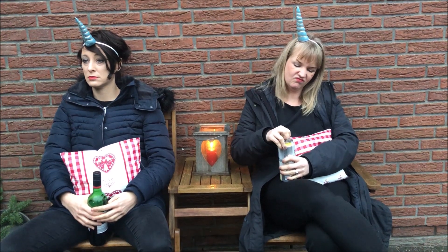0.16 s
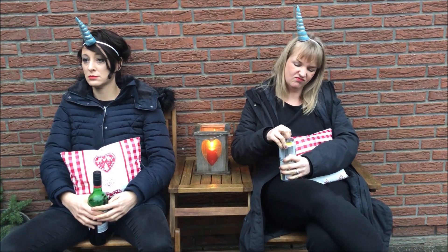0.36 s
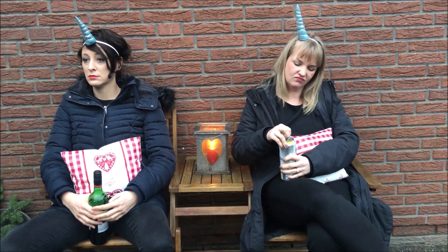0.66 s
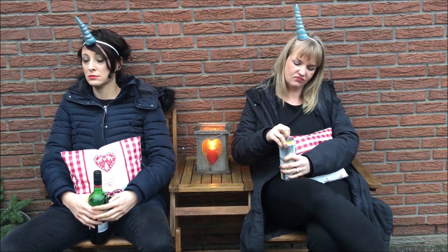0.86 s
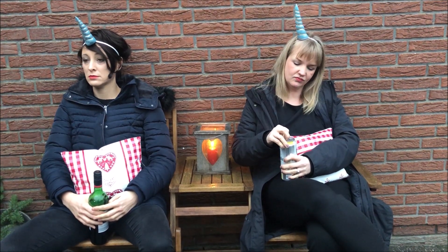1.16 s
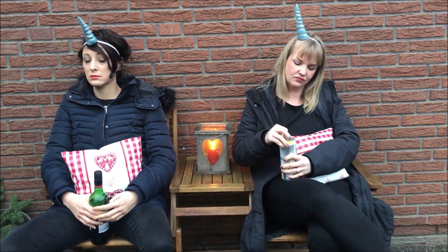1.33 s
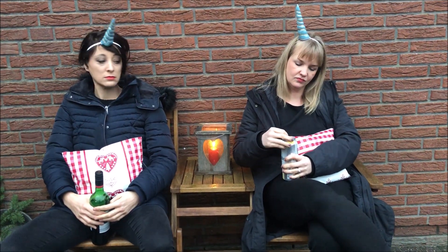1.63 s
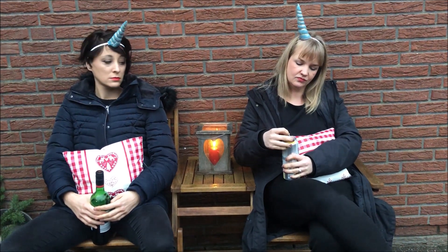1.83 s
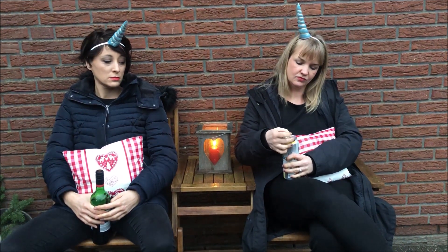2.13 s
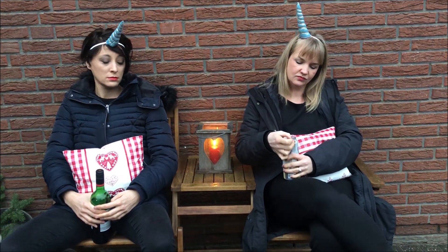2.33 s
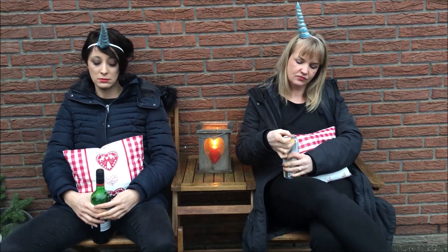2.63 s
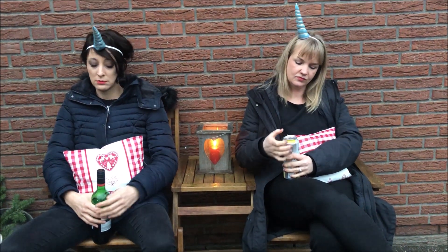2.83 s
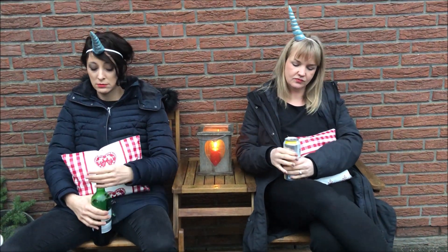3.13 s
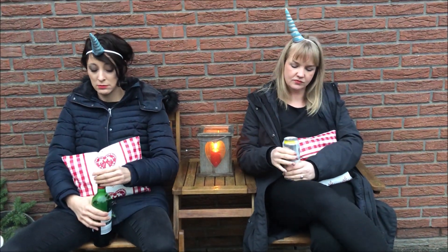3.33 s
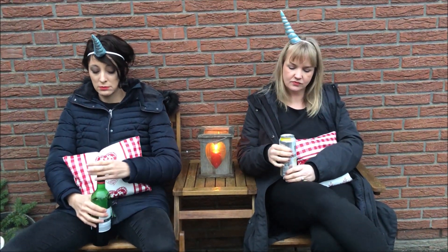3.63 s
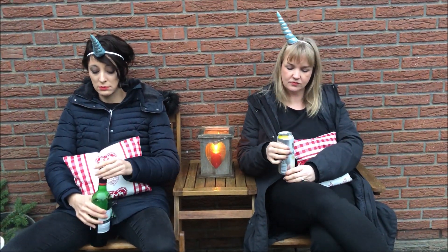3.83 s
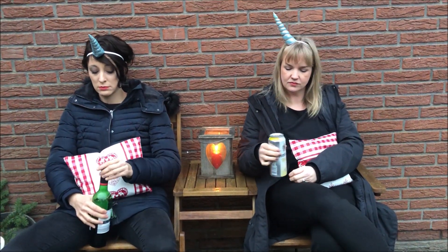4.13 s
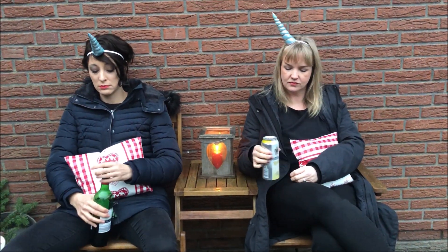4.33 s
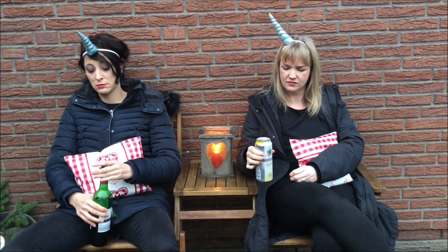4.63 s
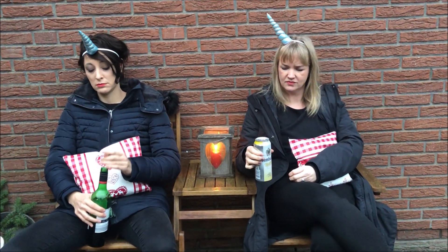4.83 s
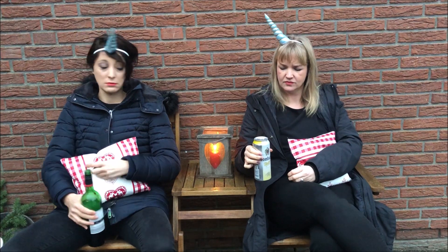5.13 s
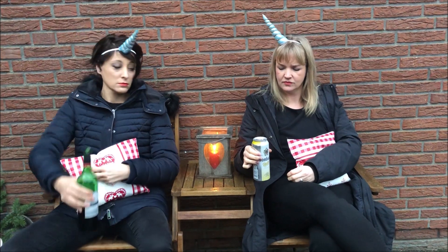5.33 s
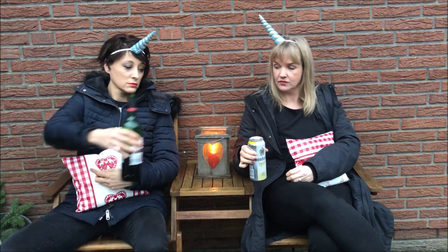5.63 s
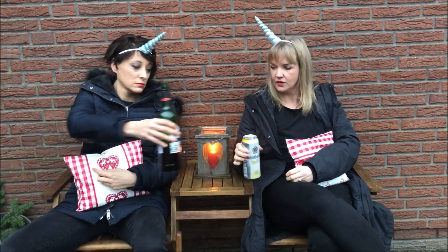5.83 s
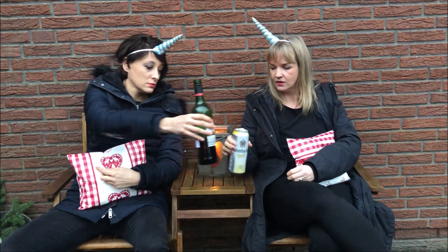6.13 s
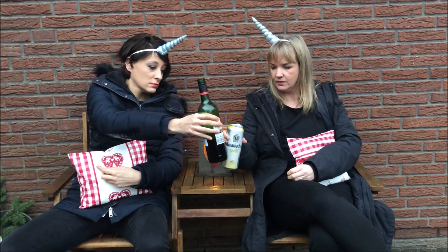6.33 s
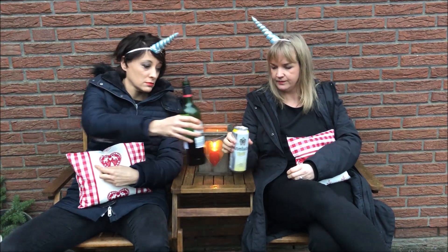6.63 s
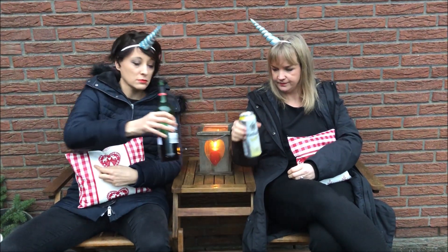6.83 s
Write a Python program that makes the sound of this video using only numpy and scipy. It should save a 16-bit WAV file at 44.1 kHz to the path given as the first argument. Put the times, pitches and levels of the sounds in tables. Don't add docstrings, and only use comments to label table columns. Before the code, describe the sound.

Outdoors by a brick wall, heard from a few metres on a phone: a bright spit of gas, a metallic crack and the loudest snap as a can opens, followed by small tinny creaks and a click. Much quieter, nylon sleeves rustle while a metal cap scrapes and ratchets irregularly from a wine bottle. A glassy knock, hollow hum, tiny slosh and soft clink follow, over low distant traffic.

```python
import sys
import numpy as np
from scipy import signal
from scipy.fft import rfft, irfft, next_fast_len
from scipy.io import wavfile
from scipy.ndimage import uniform_filter1d

SR = 44100
rng = np.random.default_rng(int(sys.argv[2]) if len(sys.argv) > 2 else 0)


def bounce(signal):
    frames = np.transpose(np.atleast_2d(signal))
    limited = np.clip(frames, -1, 1)
    pcm = np.round(limited * 32767).astype(np.int16)
    wavfile.write(sys.argv[1], SR, pcm)


def voltage_ratio(decibels):
    exponent = np.asarray(decibels, float) / 20
    return 10 ** exponent


N = 307818


# (frequency [Hz], level [dB])
TRAFFIC_BASS = [(20, -37), (35, -22.5), (58, -1.5), (75, -12.5), (88, -12), (101, 2.5), (115, -13),
                (150, -1), (185, -7), (215, -3), (255, -3), (290, -10.5), (345, -11), (400, -16.5)]
# (frequency [Hz], level [dB])
TRAFFIC_HISS = [(250, -30.5), (420, -4), (1150, -14.5), (1220, -17), (1460, -20), (3140, -25), (8970, -31),
                (16000, -35.5)]
# (middle [s], length [s], level [dB], dull part re level [dB])
ARM_MOVES = [(0.528, 0.17, -69.5, -0.5), (1.084, 0.15, -85, 6), (3.01, 0.49, -71.5, -2.5),
             (3.413, 0.46, -74.5, 1), (3.733, 0.2, -72.5, 5.5), (4.357, 1, -88.5, 6),
             (5.095, 0.46, -74, -5), (5.46, 0.56, -85, 8), (5.9, 0.83, -83, 11), (6.256, 0.67, -73, 1.5),
             (6.98, 0.9, -83, 7.5)]
# (delay [s], level [dB])
SLAPS = [
    (.0033, -6),
    (.0046, -13),
    (.0072, -17),
    (.0195, -22),
]
# (time [s], frequency [Hz], peak [dB], t60 [s])
BUMPS = [
    (4.886, 63, -48.5, 0.17),
    (5.204, 322, -50, 0.073),
    (5.235, 450, -40, 0.013),
    (6.431, 290, -44, 0.03),
]
# (time [s], peak [dB], body [dB], sizzle [dB], contact [ms])
RING_TICK = [
    (6.0891, -49, -7, -11, 0.84),
]
# (frequency [Hz], level [dB], t60 [s])
RING_MODES = [(2660, 4, 0.017), (3600, -5, .015)]
# (time [s], peak [dB], body [dB], sizzle [dB], contact [ms])
WOOD_TAP = [
    (6.955, -71, 16, 0.0017, 2.67),
]
# (frequency [Hz], level [dB], t60 [s])
WOOD_MODES = [(700, 0, 0.0366)]

# (time [s], level [dB], bubble pitch [Hz])
SLOSH = [
    (5.2, -72, 700),
    (5.211, -65, 800),
    (5.25, -60.5, 960),
    (5.282, -58.5, 1170),
    (5.32, -62.5, 1870),
    (5.345, -69.5, 2210),
    (5.37, -85, 2400),
]
# (time [s], peak [dB], body [dB], sizzle [dB], contact [ms])
NECK_KNOCK = [
    (4.8785, -43, 6, 4.5, 3.2),
]
# (frequency [Hz], level [dB], t60 [s])
NECK_MODES = [(1130, -6.5, 0.058), (1350, -15.5, 0.31), (1556, -7.5, 0.05), (2556, -5, .09),
              (2627, -10, 0.15), (2860, -12, 0.14), (3490, -6, 0.067), (3720, -8, .06), (5420, -3, .05),
              (5555, 1.5, 0.12), (6720, 0, .045), (8340, -11, .015)]
# (time [s], peak [dB], body [dB], sizzle [dB], contact [ms])
WINE_SLAPS = [
    (4.844, -61.5, 4.3, 1, 1.63),
    (5.2058, -55, 13.3, 2, 0.82),
    (5.2163, -65, 22, -8, 1.5),
    (5.2236, -44, 3.3, -2, 0.264),
    (5.2374, -70, 8.9, -8, 0.8),
]
# (frequency [Hz], level [dB], t60 [s])
WINE_SLAP_MODES = [(800, 21, 0.0036), (1700, -0.5, 0.016), (2880, -17, 0.011)]
# (time [s], peak [dB], body [dB], sizzle [dB], contact [ms])
TOAST = [
    (6.4125, -50, 4.5, 6, 3.3),
    (6.4283, -61, 8.7, -6, 3.7),
    (6.447, -62.5, 12, -10, 2.8),
    (6.4915, -59.5, 6, 1, 3.6),
    (6.5185, -79, 27, -8, 4.4),
]
# (frequency [Hz], level [dB], t60 [s])
TOAST_MODES = [(1450, 3, 0.035), (1800, 8, 0.027), (2720, -21, 0.017)]
# (time [s], level [dB], length [s])
GRIND = [
    (6.414, -52.5, 0.036),
    (6.488, -67, .04),
    (6.512, -73, 0.046),
]
# (time [s], peak [dB], body [dB], sizzle [dB])
CAP_TICKS = [(3.2076, -59, -9, -14), (3.4319, -43.5, -17, 2.5), (3.4482, -53, 7, -17), (3.4982, -53, 2, -7),
             (3.5085, -42, -1, -14), (3.5554, -51, -8, 2), (3.5624, -41.5, 3, -11), (3.6606, -65, -13, -15),
             (3.7015, -50, 8, -1), (3.7582, -53, 5, -2), (3.7878, -54, -10, -20), (3.8631, -60, -16, -19),
             (3.895, -62, -6, -13), (3.928, -57, 10.5, 1), (3.9902, -63, 14, 9), (4.2426, -56.5, -10, -6),
             (4.253, -60.5, 2, -5), (4.3599, -52, -10, -15), (4.3999, -55, -0.5, 1), (4.4787, -56, 3, -5),
             (4.5111, -49.5, -6, 2), (4.6518, -60.5, 4, -14)]
# (frequency [Hz], level [dB], t60 [s])
CAP_MODES = [(1960, -5, .012), (2530, -6, .012), (3040, -4, .015), (3420, 0, .025), (5400, -8, .008)]
# (time [s], level [dB], length [s])
CAP_TWISTS = [(3.429, -62.5, 0.085), (3.51, -67, 0.083), (3.55, -70, 0.05), (3.66, -65.5, 0.073),
              (3.696, -63, 0.087), (3.772, -75, 0.064), (3.868, -80, 0.097), (3.93, -70, 0.1),
              (4.246, -75, 0.071), (4.347, -84, .07), (4.456, -74.5, 0.065), (4.507, -81, .07),
              (4.65, -80, .04)]
# (time [s], level [dB], length [s])
CAP_CHATTER = [
    (3.44, -61, .06),
    (3.66, -67.5, .08),
    (3.705, -58, .06),
    (3.76, -69, .05),
    (3.785, -70, 0.065),
    (3.862, -67, 0.047),
    (3.893, -69, .04),
    (3.928, -76, 0.049),
]

# (time [s], peak [dB], body [dB], sizzle [dB])
NAIL_TAPS = [
    (2.0354, -60, -13, -11),
    (2.058, -50, -19, -9),
    (2.4094, -40, 5, 9),
]
# (frequency [Hz], level [dB], t60 [s])
NAIL_MODES = [(990, -3, 0.011), (1400, -1, 0.0068), (2136, 15.5, 0.0034), (2680, 1, 0.0072),
              (3530, -13, 0.0046), (4440, -6, 0.0065), (6130, -5, 0.0099), (6820, -2, 0.011),
              (7260, -4, 0.011), (9600, -1, 0.0086), (11000, -7, 0.0079)]
# (time [s], level [dB], length [s])
CREAKS = [
    (.482, -58, 0.055),
    (.53, -71, 0.04),
    (.652, -69, .06),
    (.8, -75, 0.087),
    (1.004, -68, 0.076),
    (1.037, -62, 0.029),
    (1.05, -77, .06),
    (1.1, -74, 0.053),
]
# (time [s], peak [dB], body [dB], sizzle [dB])
TAB_BENDS = [(0.4692, -40, 1, 3.5), (0.507, -50.5, 4, 1), (0.5223, -53, -14, -4), (0.5308, -49, -0.5, 0.5),
             (0.5407, -50.5, 1.5, -2), (0.5712, -55.5, -1, 1), (0.6509, -54, 2, 4.5), (0.6754, -56, -3, -4),
             (0.7458, -59, -1, -5), (0.8013, -66.5, 7.5, 14.5), (0.8085, -59.5, 4, -3),
             (0.826, -58.5, -5, 7.5), (0.85, -68, -7, 15), (0.8786, -61, 2, 15.5), (0.8977, -48.5, -5.5, 4),
             (0.9679, -53, 4, 19.5), (1.004, -42.5, -1.5, 3.5), (1.048, -47.5, 3, 14.5),
             (1.2704, -69.5, 13.5, 18)]
# (time [s], peak [dB], body [dB], sizzle [dB])
TAB_SLIP = [
    (1.0355, -50, -14, 4),
]
# (time [s], peak [dB], body [dB], sizzle [dB], contact [ms])
TAB_SNAP = [
    (1.0983, -29.5, -9, -5, 0.7),
]
# (frequency [Hz], level [dB], t60 [s])
LID_LOW_MODES = [(1058, 6.5, 0.055), (1365, 5, 0.022), (1660, 2, 0.015), (2030, 0.5, 0.038),
                 (2130, -16, 0.039)]
# (frequency [Hz], level [dB], t60 [s])
LID_TOP_MODES = [(3680, 5, 0.0071), (4130, -4, 0.0075), (6560, -6, 0.0043), (6820, -1.5, .007),
                 (7700, -6, 0.0054), (9750, -2, .012), (11700, -13, 0.0035), (13200, 2.5, .006)]
# (body from, body to, middle from, middle to, sizzle from) [Hz]
LID_BANDS = (900, 2100, 3000, 4500, 6300)
# (time [s], level [dB])
TEAR = [
    (.263, -41.5),
    (.28, -41),
    (.292, -37.5),
    (.3, -32),
    (.312, -33.5),
    (.34, -48),
    (.45, -63.5),
]
# (frequency [Hz], level [dB])
TEAR_COLOUR = [(240, -46.5), (400, -23), (588, -16.5), (800, -7), (1300, -14), (2120, -6), (3210, -7.5),
               (4310, -2), (5600, -2), (8630, -8.5), (16000, -20)]
# (time [s], frequency [Hz], peak [dB], t60 [s])
POPS = [
    (0.1004, 800, -33, .012),
    (.2829, 764.7, -20.5, .025),
    (.2995, 893, -36.5, .04),
    (.328, 710, -42, .04),
    (.329, 997.4, -44, .05),
]
# (time [s], peak [dB], body [dB], sizzle [dB], contact [ms])
FLAP_DROP = [
    (.2822, -3, -12, -1, .35),
]
# (time [s], peak [dB], body [dB], sizzle [dB], contact [ms])
FOAM_BURSTS = [
    (0.2932, -27, -2, 0, 1),
    (0.2995, -23.5, 0, -1, 0.93),
    (0.306, -27, -2, -2.5, 1.1),
]
# (frequency [Hz], level [dB], t60 [s])
FLAP_MODES = [(790, -5, 0.02), (950, -10.5, 0.017), (2040, -4.5, 0.0053), (3300, -1, .005),
              (4380, 0.5, 0.0052), (5500, -5, 0.0089), (6960, -4, 0.0059), (8700, 2.5, .006),
              (9800, -4.5, .005), (11000, -12, .004), (12800, -4, 0.0035)]
# (body from, body to, middle from, middle to, sizzle from) [Hz]
FLAP_BANDS = (1100, 2500, 2500, 6000, 6000)
# (time [s], peak [dB], body [dB], sizzle [dB], contact [ms])
SPLIT = [
    (.262, -21, -1.5, 3, 0.6),
    (.2652, -24.5, 5.5, 1.5, .5),
]
# (frequency [Hz], level [dB], t60 [s])
SPLIT_MODES = [(1910, -1.5, 0.0069), (2250, -1.5, 0.0073), (4400, -0.5, .008), (6840, 4.5, 0.024),
               (9600, -1.5, 0.0074), (12535, -2.5, 0.0039)]
# (time [s], peak [dB], body [dB], sizzle [dB], contact [ms])
SCORE_CRACK = [
    (.1005, -12, -4, -12, 0.3),
]
# (frequency [Hz], level [dB], t60 [s])
SCORE_MODES = [(1100, -20, .006), (1560, -14, .006), (1940, -5, .006), (2160, 1, 0.009), (2700, -7, .006),
               (4000, 3, .009), (4600, -2, 0.006)]
# (body from, body to, middle from, middle to, sizzle from) [Hz]
SCORE_BANDS = (1250, 2500, 3500, 4700, 5000)
# (time [s], level [dB])
GAS = [
    (.0428, -50),
    (.054, -44),
    (.062, -29),
    (.08, -26),
    (.1, -27.5),
    (.112, -32),
    (.122, -44.5),
    (.16, -57),
    (.22, -70),
]
# (frequency [Hz], level [dB])
GAS_COLOUR = [(880, -58.5), (1500, -27), (2140, -20), (2600, -23.5), (4780, -17.5), (9370, -3.5),
              (10900, -11), (13400, -4.5), (16000, -10)]
# (frequency [Hz], width [Hz], level [dB])
WHISTLES = [(3280, 130, -12.5), (4200, 210, -5.5), (5800, 110, -5), (6650, 750, 5), (9012, 180, -6),
            (9500, 900, 4), (13660, 260, 6.5)]
# (time [s], peak [dB], body [dB], sizzle [dB], contact [ms])
SEAL_BREAK = [
    (0.0434, -23.5, -41, 6, 0.42),
]
# (frequency [Hz], level [dB], t60 [s])
SEAL_MODES = [(3140, 3.5, 0.045), (4320, -1, 0.07), (5660, 2.5, 0.067), (6400, -4, 0.14), (7260, 1, 0.076),
              (9400, -0.5, 0.067), (9850, 3.5, .07), (10750, -2, 0.044), (13460, -1, .04),
              (13600, -1.5, 0.05)]

RIP_WET = 0.65


def band(x, lo_hz, hi_hz, order=2):
    return signal.sosfilt(signal.butter(order, [lo_hz, hi_hz], "bandpass", fs=SR, output="sos"), x)


def highpass(x, hz, order):
    return signal.sosfilt(signal.butter(order, hz, "highpass", fs=SR, output="sos"), x)


def unit(x):
    return x / np.sqrt(np.mean(x ** 2))


def coloured(x, points):
    hz, db = np.transpose(points)
    size = next_fast_len(len(x))
    f = np.arange(size // 2 + 1) * SR / size + 1
    level_db = np.interp(np.log(f), np.log(hz), db, left=-80, right=-80)
    return unit(irfft(rfft(x, size) * voltage_ratio(level_db), size)[:len(x)])


def walk(rate):
    hold = int(SR / rate)
    steps = np.repeat(rng.standard_normal(N // hold + 1), hold)
    return unit(uniform_filter1d(steps, hold)[:N])


def gain(rows):
    rows = np.asarray(rows)
    return voltage_ratio(np.interp(np.arange(N) / SR, rows[:, 0], rows[:, 1], left=-150, right=-150))


def grains(rate, spread_db):
    clicks = rng.standard_normal(N) * (rng.random(N) < rate / SR)
    return clicks * voltage_ratio(spread_db * rng.exponential(size=N))


def since(s):
    return np.maximum(np.arange(N) / SR - s, 0)


def bites(rows):
    s, db, length = np.transpose(rows)[:, :, None]
    t = since(s)
    grip = np.minimum(t / 0.0096, 1)
    return (voltage_ratio(db - 19 * t / length) * grip).sum(axis=0)


def touching(rows, contact_ms):
    return [tuple(row) + (contact_ms,) for row in rows]


def blows(events, modes, ring_db, scatter_db, edges=(600, 2500, 2500, 6000, 6000)):
    hz, db, t60 = np.transpose(modes)[:, :, None]
    out = np.zeros(N + SR)
    t = np.arange(int(SR * (t60.max() + 0.03))) / SR
    for s, peak_db, body_db, sizzle_db, contact_ms in events:
        push = t * 1000 / contact_ms
        crackle = np.resize(rng.standard_normal(2048), len(t)) * push * np.exp(1 - push) ** 1.6
        crackle[int(contact_ms * SR / 1000)] += 1.2
        strength, detune, phase = rng.standard_normal((3, len(hz), 1))
        mode_hz = hz * (1 + 0.006 * scatter_db * detune)
        decay = voltage_ratio(db + scatter_db * strength - 60 * t / t60)
        ring = (decay * np.sin(2 * np.pi * (mode_hz * t + phase))).sum(axis=0)
        sound = crackle + voltage_ratio(ring_db) * ring * np.clip(push, 0, 1) ** 2
        parts = ((edges[0], edges[1], body_db, 1),
                 (edges[2], edges[3], 0, -1),
                 (edges[4], 15300, sizzle_db, 1))
        for lo, hi, rel_db, sign in parts:
            part = band(sound, lo, hi)
            out[int(s * SR):][:len(t)] += sign * voltage_ratio(peak_db + rel_db - 2) * part / np.abs(part).max()
    return out[:N]


def traffic():
    swell_db = 0.44 * walk(0.97) + 0.5 * walk(1.7)
    bass = voltage_ratio(-61 + swell_db) * coloured(rng.standard_normal(N), TRAFFIC_BASS)
    return bass + voltage_ratio(-70.5) * coloured(rng.standard_normal(N), TRAFFIC_HISS)


def yard(x):
    t = np.arange(SR // 2) / SR
    noise = rng.standard_normal(len(t))
    low = band(noise, 300, 3800)
    tail = low * voltage_ratio(-60 * t / 0.32) + 0.89 * (noise - low) * voltage_ratio(-60 * t / 0.2)
    response = tail * (0.45 + 0.55 * np.clip(t / 0.017, 0, 1) ** 12)
    response *= voltage_ratio(-12) / np.sqrt(np.sum(response ** 2))
    response[0] = 1
    for s, db in SLAPS:
        response[int(s * SR):][:2] += voltage_ratio(db) * np.array([0.7, 0.3])
    return signal.fftconvolve(x, response)[:N]


def cloth():
    slips = rng.standard_normal((2, N)) + 0.51 * unit(grains(2100, 2.4))
    flutter = voltage_ratio(1.5 * walk(25))
    s, length, db, dull_db = np.transpose(ARM_MOVES)[:, :, None]
    speed = np.exp(-8 * ((np.arange(N) / SR - s) / length) ** 2)
    bright_gain = voltage_ratio(-86.5) + (voltage_ratio(db) * speed).sum(axis=0)
    dull_gain = voltage_ratio(-89.5) + (voltage_ratio(db + dull_db) * speed).sum(axis=0)
    bright = unit(band(slips[0], 3500, 12000)) * bright_gain
    dull = unit(band(slips[1], 290, 3500)) * dull_gain
    return flutter * voltage_ratio(1.5) * (bright + dull)


def bumps():
    s, hz, db, t60 = np.transpose(BUMPS)[:, :, None]
    t = since(s)
    return (voltage_ratio(db - 60 * t / t60) * np.sin(2 * np.pi * hz * t)).sum(axis=0)


def small_taps():
    return blows(RING_TICK, RING_MODES, -2, 0) + blows(WOOD_TAP, WOOD_MODES, 0.5, 0)


def slosh(count=90):
    rows = np.array(SLOSH)
    bubbles = np.zeros(N)
    t = np.arange(SR // 40) / SR
    for when, pitch, size in rng.random((count, 3)):
        s = rows[0, 0] + when * (rows[-1, 0] - rows[0, 0])
        hz = np.interp(s, rows[:, 0], rows[:, 2]) * 2 ** (1.8 * pitch - 0.8)
        glide = np.sin(2 * np.pi * hz * t * (1 + 25 * t))
        bubbles[int(s * SR):][:len(t)] += voltage_ratio(12 * size) * glide * np.exp(-t * hz / 3)
    wash = unit(band(rng.standard_normal(N), 720, 4800))
    return 0.66 * (bubbles + wash) * gain(rows)


def boom():
    t = since(4.882)
    hz = 145 - 24.16 * np.exp(-t / 0.023)
    phase = 2 * np.pi * np.cumsum(hz) / SR
    rise = np.minimum(t / 0.022, 1) ** 2
    return np.sqrt(2) * voltage_ratio(-46 - 60 * t) * rise * np.sin(phase)


def glass():
    neck = blows(NECK_KNOCK, NECK_MODES, -2.5, 0)
    wine = blows(WINE_SLAPS, WINE_SLAP_MODES, -4.5, 0.86)
    return neck + wine + blows(TOAST, TOAST_MODES, -10, 4)


def grind():
    slips = rng.standard_normal(N) + 0.6 * unit(grains(1500, 2.5))
    scrape = unit(band(slips, 1540, 2000)) + voltage_ratio(-4) * unit(band(slips, 2300, 3700))
    return scrape * bites(GRIND)


def twist():
    slips = 0.6 * rng.standard_normal(N) + unit(grains(700, 2.5))
    rub = voltage_ratio(-3.5) * unit(band(slips, 3370, 3550)) + unit(band(slips, 860, 4600))
    return rub * bites(CAP_TWISTS) * voltage_ratio(2.4 * walk(60) + 3.5)


def chatter():
    return unit(band(grains(260, 2.5), 3270, 3560)) * bites(CAP_CHATTER)


def cap_ticks():
    return blows(touching(CAP_TICKS, 1.2), CAP_MODES, -5, 2.5)


def nail():
    return blows(touching(NAIL_TAPS, 0.7), NAIL_MODES, -1, 0.51, edges=(800, 3000, 3000, 6000, 6000))


def creak():
    slips = unit(grains(1800, 1.2))
    hum = unit(band(slips, 1030, 1205))
    hum = hum + voltage_ratio(-8) * unit(band(slips, 1250, 1260))
    hum = hum + voltage_ratio(-2.5) * unit(band(slips, 1800, 3000))
    return hum * bites(CREAKS)


def tab():
    modes = LID_LOW_MODES + LID_TOP_MODES
    bends = touching(np.add(TAB_BENDS + TAB_SLIP, (0, 0, 4, 8)), 0.54)
    bending = blows(bends, modes, -1, 3, edges=LID_BANDS)
    return bending + blows(TAB_SNAP, modes, -6.5, 2.3, edges=(900, 1640, 3160, 6500, 6500))


def tear():
    foam = rng.standard_normal(N) + 0.22 * unit(grains(4000, 1.9))
    lid = unit(band(foam, 3700, 4900)) + voltage_ratio(-9) * unit(band(foam, 640, 1150))
    return (coloured(foam, TEAR_COLOUR) + voltage_ratio(-9) * lid) * gain(TEAR) * voltage_ratio(4 * walk(160))


def pop():
    s, hz, db, t60 = np.transpose(POPS)[:, :, None]
    t = since(s)
    rise = np.minimum(t / 0.00073, 1)
    return (voltage_ratio(db - 60 * t / t60) * rise * np.sin(2 * np.pi * hz * t)).sum(axis=0)


def flap():
    split = blows(SPLIT, SPLIT_MODES, -2.5, 1.2, edges=FLAP_BANDS)
    return split + blows(FLAP_DROP + FOAM_BURSTS, FLAP_MODES, -7.5, 0.88, edges=FLAP_BANDS)


def score_crack():
    return blows(SCORE_CRACK, SCORE_MODES, 0.5, 0, edges=SCORE_BANDS)


def gas():
    jet = rng.standard_normal(N) + 0.3 * unit(grains(2500, 1.8))
    whistle = sum(voltage_ratio(db) * unit(band(jet, hz - width / 2, hz + width / 2)) for hz, width, db in WHISTLES)
    hiss = coloured(jet, GAS_COLOUR) + voltage_ratio(-10.5) * unit(whistle)
    return unit(hiss) * gain(GAS) * voltage_ratio(0.78 * walk(250) - 1)


def seal():
    return blows(SEAL_BREAK, SEAL_MODES, 5.7, 0)


def scene():
    crack = score_crack()
    lid = highpass(RIP_WET * crack + flap() + pop() + tear(), 500, 3)
    can = seal() + gas() + lid + tab() + creak() + nail()
    bottle = cap_ticks() + chatter() + twist() + grind() + glass() + slosh()
    near = can + bottle + small_taps()
    shadowed = (1 - RIP_WET) * crack
    return (yard(near) + shadowed + boom() + bumps() + cloth() + traffic())[None]


def band_limit(x):
    return signal.sosfilt(signal.butter(12, 16900, fs=SR, output="sos"), x)


def record(dry):
    soft = highpass(1.6 * np.tanh(dry / 1.6), 28, 2)
    mix = signal.sosfilt(signal.ellip(8, 0.2, 60, 16200, fs=SR, output="sos"), soft)
    return band_limit(mix)


dry = scene()
out = record(dry)
bounce(out)
```